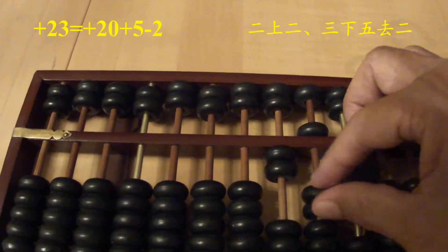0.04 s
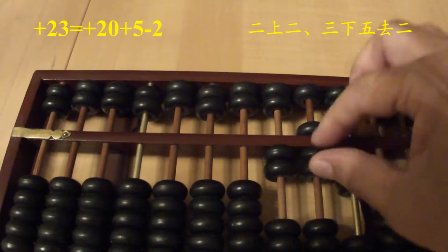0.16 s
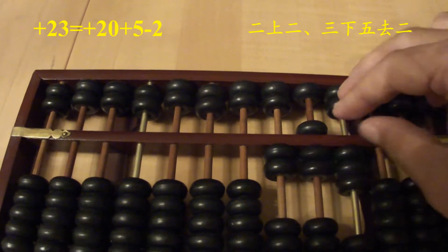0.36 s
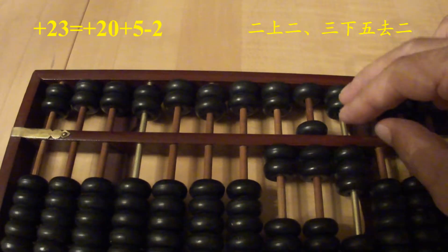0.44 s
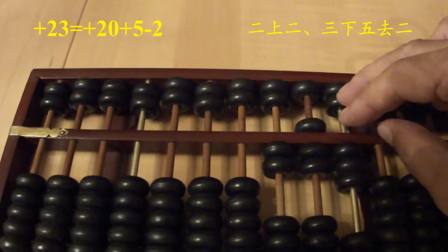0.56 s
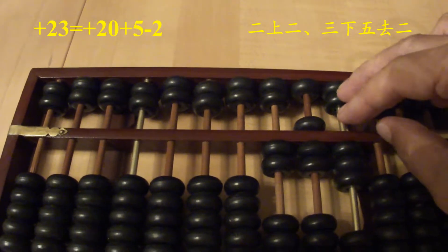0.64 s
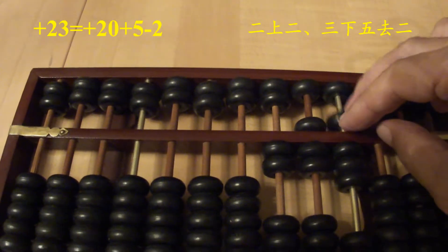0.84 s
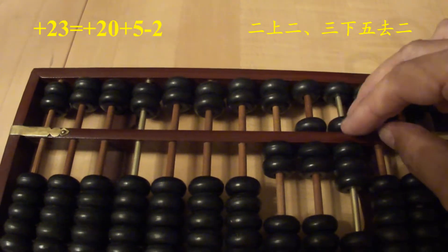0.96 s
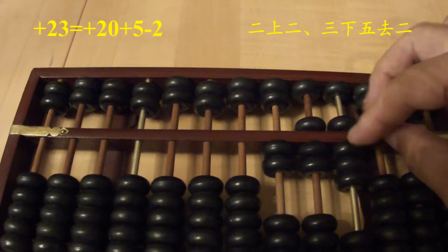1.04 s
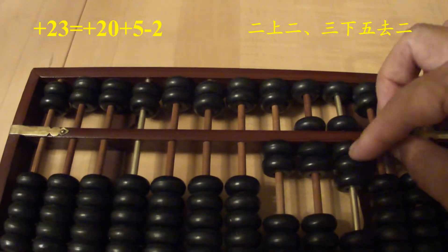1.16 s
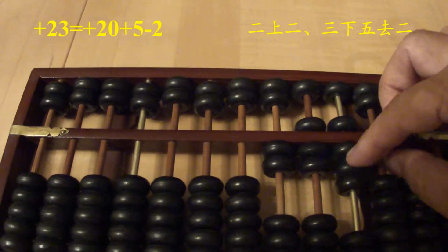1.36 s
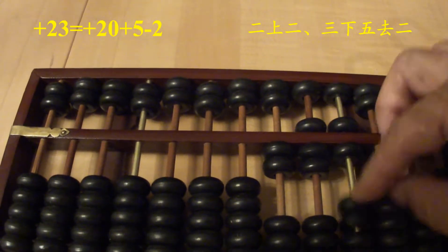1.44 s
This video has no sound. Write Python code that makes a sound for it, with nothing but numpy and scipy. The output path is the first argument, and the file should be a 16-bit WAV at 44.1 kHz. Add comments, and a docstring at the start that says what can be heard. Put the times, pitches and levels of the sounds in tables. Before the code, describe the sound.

Wooden abacus beads are flicked along their rods, cracking together in a quick, loud clatter with a hollow knock. A few lighter, separate clicks follow. The sound is close and to the right in a small, quiet room.

```python
"""A small, quiet room: fingers flick wooden abacus beads along their rods, close to the right microphone.
Each contact is a hard crack of the beads and a knock of the frame; loose beads slide, chatter and settle.
Hard blows shake the frame and the hollow desk, and soft handling bumps land on the left.
The room answers over a steady hush; three notches are cut in the upper midrange."""
import sys
import numpy as np
from scipy import signal
from scipy.fft import rfft, irfft
from scipy.io import wavfile
from scipy.ndimage import uniform_filter1d

SR = 44100
rng = np.random.default_rng(int(sys.argv[2]) if len(sys.argv) > 2 else 0)


def wav_out(sig):
    """Save sig, one row per channel (or a flat mono array), as 16-bit PCM at SR to the path in sys.argv[1]."""
    wavfile.write(sys.argv[1], SR, np.round(np.clip(np.atleast_2d(sig).T, -1, 1) * 32767).astype(np.int16))


N = 66150
T = np.arange(N) / SR
FREQS = np.fft.rfftfreq(2 * N, 1 / SR)


def undb(db):
    """Decibels to gain."""
    return 10 ** (np.asarray(db) / 20)


def unit(x):
    """Scale to rms 1."""
    return x / np.sqrt(np.mean(x ** 2))


def colour(x, points):
    """Minimum-phase EQ through (frequency [Hz], gain [dB]) points."""
    hz, db = np.array(points, float).T
    gain = undb(np.interp(np.log(FREQS + 1), np.log(hz), db))
    cepstrum = irfft(np.log(gain))
    cepstrum[1:N] *= 2
    cepstrum[N + 1:] = 0
    return irfft(rfft(x, 2 * N) * np.exp(rfft(cepstrum)))[..., :N]


def at(x, start):
    """Start a sound at a given second."""
    return np.pad(x, (max(int(start * SR), 0), 0))[:N]


def burst(points, rise_s, fall_s):
    """A short coloured rasp with the energy of 2 ms at level 1."""
    envelope = np.minimum(T / rise_s, 1) * np.exp(-np.maximum(T - rise_s, 0) / fall_s)
    rasp = colour(rng.standard_normal(N) * envelope, points)
    return rasp * np.sqrt(.002 * SR / np.sum(rasp ** 2))


def ring(modes, pitch=1):
    """Fading modes; every contact point weights them a little differently."""
    t = T[:N // 4]
    out = 0
    for hz, db, t60 in modes:
        weight = undb(db + .8 * rng.standard_normal()) * rng.choice([-1, 1])
        detuned_hz = hz * pitch * (1 + 0.0068 * rng.standard_normal())
        out += weight * np.exp(-np.log(1000) * t / t60) * np.sin(2 * np.pi * detuned_hz * t)
    return np.pad(out, (0, N - len(t)))


def tail(t60, build_s):
    """Dense fading reflections of energy 1."""
    x = rng.standard_normal(N) * np.exp(-np.log(1000) * T / t60) * np.minimum(T / build_s, 1) ** 2
    return x / np.sqrt(np.sum(x ** 2))


def hush():
    """Wide, steady room tone; rumble and a faint wavering hum lie to the left."""
    # room tone spectrum, then each side's EQ (frequency [Hz], gain [dB])
    tone = [(15, -50.5), (25, -21.5), (141, -11), (175, -7.5), (217, -5.5), (249, -6), (317, -3.5),
            (416, -4.5), (516, -2), (591, -3.5), (887, -4.5), (1190, -5.5), (1290, -7.5), (2050, -11),
            (2550, -17.5), (2910, -25.5), (4490, -26.5), (5000, -23), (6560, -20), (12200, -33.5),
            (16000, -37.5)]
    left_eq = [(40, 3), (100, 2), (250, 1.5), (500, 1.5), (2000, 1), (7000, 4), (12500, -5), (15500, 1)]
    right_eq = [(40, -6.5), (100, -6), (250, 0), (500, -2), (2000, 0), (9000, 1), (12500, -6.5),
                (15000, 6.5)]
    mid, side = (undb(-57) * unit(colour(rng.standard_normal(N), tone)) for _ in range(2))
    side = colour(side, [(1500, 6), (5000, 0.012)])  # wider in the lows and mids
    hum_hz, width_hz = 516.6, 19
    resonance = signal.iirpeak(hum_hz, hum_hz / width_hz, SR)
    hum = undb(-61) * unit(signal.lfilter(*resonance, rng.standard_normal(N)))
    return np.array([colour(mid + side, left_eq) + hum, colour(mid - side, right_eq)])


def bumps():
    """Each handling bump is one short, dull push; the right side hears it weakly and inverted."""
    # bumps near the left microphone (time [s], pitch [Hz], peak [dB])
    pushes = [(0.0682, 620, -26.5), (0.1103, 574, -29), (.148, 660, -30.5), (.588, 745, -30.5),
              (0.6877, 199, -38), (.694, 154, -34), (.828, 270, -36)]
    half_length_cycles = 0.44
    out = 0
    for centre, hz, db in pushes:
        cycles = hz * (T - centre)
        out += undb(db) * np.cos(2 * np.pi * cycles) * np.exp(-(cycles / half_length_cycles) ** 2)
    return np.array([-out, undb(-9) * out])


def slides():
    """Grainy friction of a bead on its rod."""
    # bead strokes (start [s], length [s], level [dB])
    strokes = [(0.17, 0.13, -51), (0.279, 0.031, -38), (0.879, 0.071, -49)]
    # friction spectrum (frequency [Hz], gain [dB])
    rub_eq = [(200, -7), (900, 1), (2400, 4.5), (3500, -7), (6200, 4.5), (9200, -3), (10700, -13.5),
              (12300, -35.5), (16000, -37)]
    fade_s, roughness = 0.00686, 0.16
    grain = np.exp(roughness * unit(uniform_filter1d(rng.standard_normal(N), size=90)))
    push = sum(undb(db) * np.clip(np.minimum(T - start, start + length - T) / fade_s, 0, 1)
               for start, length, db in strokes)
    return push * unit(colour(grain * rng.standard_normal(N), rub_eq))


def clicks():
    """Each contact cracks and rings the beads, and knocks the frame; gentle ones are duller."""
    # bead contacts (time [s], bead crack [dB], frame knock [dB], frame pitch [ratio])
    contacts = [(.2134, -53, -28.5, 0.88), (0.219, -45, -40, 1.26), (.2356, -14, -17.5, 0.99),
                (0.2381, -14.5, -37, 0.9), (0.2403, -21.5, -20, .85), (0.2416, -5, -13.5, .86),
                (.2497, -36, -21.5, .88), (0.259, -28, -23, 1.1), (0.3162, -28, -29.5, 1.4),
                (.3352, -16, -16.5, .97), (0.3389, -52, -34, 1.2), (.3464, -25, -22.5, 1.1),
                (0.3541, -25, -25, 1.2), (.3697, -30, -27.5, 1.7), (0.3758, -27, -26.5, 1.07),
                (0.379, -44, -45, 1.1), (0.3879, -35, -33.5, 1.1), (0.393, -50, -40.5, 1.3),
                (0.7285, -51.5, -39, 1.11), (.7360, -55, -32, 0.78), (0.7428, -36.5, -27, 1.08),
                (.7561, -40.5, -34.5, 0.87), (.7650, -59, -45, 1.2), (0.958, -18.5, -24.5, 1.07),
                (.9587, -19, -25.5, 1.07), (1.0090, -63, -35, 1.1), (1.4910, -30, -42, 3.2),
                (1.4948, -48, -31.5, 1.05), (1.4982, -24.5, -48.5, 1.08)]
    # attack spectra of bead and frame (frequency [Hz], gain [dB])
    crack_eq = [(1000, -28), (3000, -3.5), (4500, -7.5), (5600, 3.5), (7200, -4), (9100, -1), (10700, -11),
                (12100, -51.5), (15500, -34.5)]
    knock_eq = [(60, -33), (250, -28.5), (700, -8), (1300, -1), (2400, 5.5), (3500, -5), (5000, -15.5),
                (12000, -56)]
    # modes of the beads, and of frame and rods (frequency [Hz], level [dB], t60 [s])
    bead_modes = [(5640, 6.5, 0.0347), (5750, 2, .06), (6640, -21.5, 0.044), (7050, 12, 0.0389),
                  (7630, -4.5, 0.032), (9250, 7.5, 0.038)]
    frame_modes = [(761, -17, 0.051), (1200, -6.5, 0.035), (1516, -8.5, 0.016), (1917, -5.5, 0.021),
                   (2106, 1, 0.042), (2335, -4, 0.028), (2610, -7, 0.012), (3590, -8, 0.019)]
    out = 0
    for start, crack_db, knock_db, pitch in contacts:
        crack = burst(crack_eq, rise_s=0.00052, fall_s=0.0011)
        bead = crack + undb(-23) * ring(bead_modes)
        bead = colour(bead, [(6000, 0), (12000, 0.06 * crack_db)])  # softer hit, less treble
        knock = burst(knock_eq, rise_s=0.00048, fall_s=0.0021)
        frame = undb(-5.5) * knock + undb(-4) * ring(frame_modes, pitch)
        out += at(undb(crack_db) * bead + undb(knock_db) * frame, start)
    return out


def thuds():
    """The woody body of the frame swells after a hard blow, and the desk rings on, low and hollow."""
    # blows that shake the whole abacus (time [s], level [dB])
    blows = [(.2418, -24), (0.3358, -30.5)]
    # spectrum of the frame's body (frequency [Hz], gain [dB])
    body_eq = [(50, -38.5), (140, -9.5), (300, 4), (480, 0.5), (900, 3), (1300, -5.5), (2500, -13),
               (4000, -31), (12000, -55.5)]
    # hollow of the desk (frequency [Hz], level [dB], t60 [s])
    desk_modes = [(288.4, 5, 0.37), (334.3, -1.5, 0.461), (400, -6.5, .35)]
    out = 0
    for start, db in blows:
        body = burst(body_eq, rise_s=0.03, fall_s=0.059)
        desk = undb(-29.5) * ring(desk_modes)
        out += undb(db) * at(body + desk, start)
    return out


def room(x):
    """Direct sound, quick reflections from the desk, and walls that hold the lows longest."""
    # colour of the wall reflections (frequency [Hz], gain [dB])
    wall_eq = [(100, -17), (290, 7.5), (600, 3.5), (1100, -6), (2200, -3), (6000, -7.5), (10000, -11.5),
               (16000, -10.5)]
    crossover_hz, build_s = 1500, 0.01233
    highs = signal.lfilter(*signal.butter(2, crossover_hz, "high", fs=SR), tail(0.31, build_s))
    lows = signal.lfilter(*signal.butter(2, crossover_hz, fs=SR), tail(0.36, build_s))
    desk = undb(-8.5) * tail(t60=0.089, build_s=0.0019)
    walls = undb(-7.5) * colour(lows + highs, wall_eq)
    return x + signal.fftconvolve(x, desk + walls)[:N]


def scene():
    """The abacus sits to the right; the left side hears it duller and in opposite polarity."""
    # shading of the far, left side (frequency [Hz], gain [dB])
    far_eq = [(100, -3), (500, -7.5), (1100, -10), (2200, -12.5), (6000, -15), (15000, -23.5)]
    abacus = clicks() + thuds() + slides()
    right = room(abacus)
    left = -colour(0.53 * right + 0.55 * room(abacus), far_eq)  # shared reflections plus its own
    return np.array([left, right]) + bumps() + hush()


def record(dry):
    """Three notches, a hard clip at full scale and a steep top cut."""
    # upper-midrange notches (centre [Hz], width [Hz])
    notches = [(3040, 804), (4020, 980), (5020, 1120)]
    for hz, width_hz in notches:
        dry = signal.lfilter(*signal.iirnotch(hz, hz / width_hz, SR), dry)
    top_cut = signal.ellip(8, .2, 70, 15800, fs=SR, output="sos")
    return signal.sosfilt(top_cut, np.clip(dry, -1, 1))


dry = scene()
out = record(dry)
wav_out(out)
```